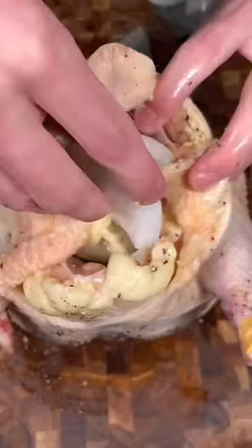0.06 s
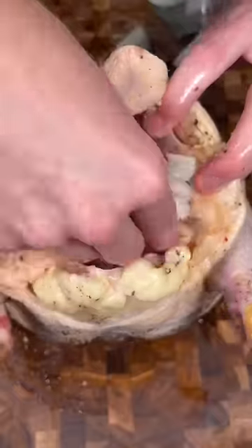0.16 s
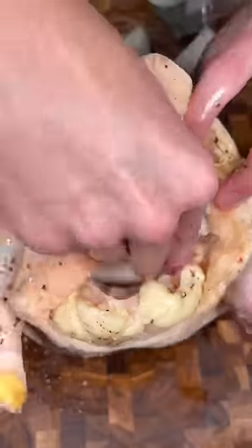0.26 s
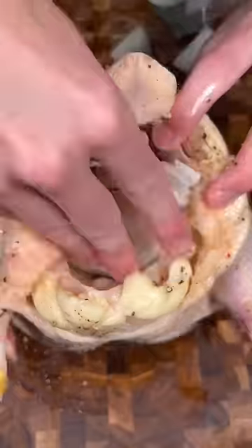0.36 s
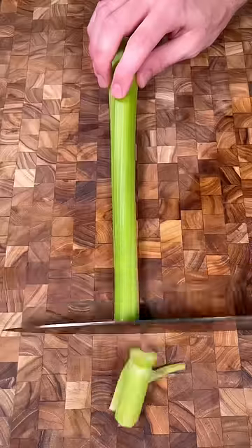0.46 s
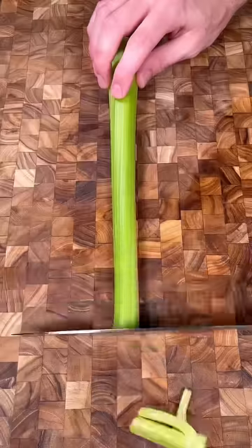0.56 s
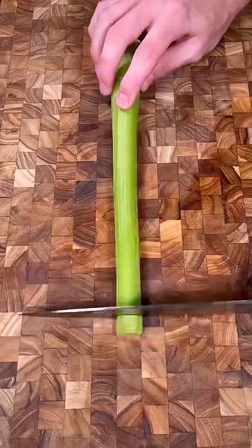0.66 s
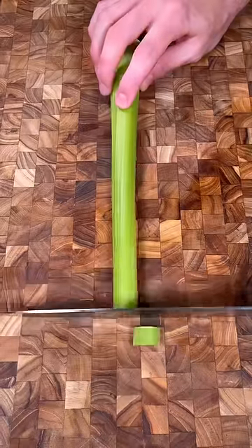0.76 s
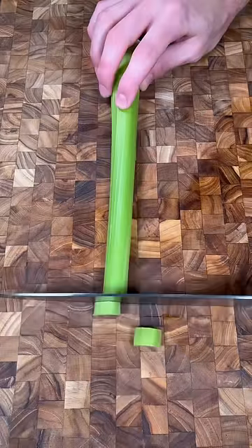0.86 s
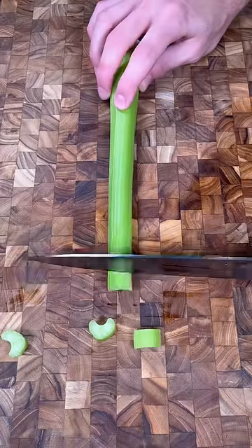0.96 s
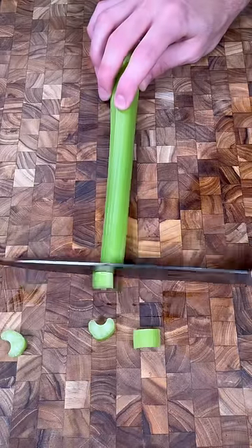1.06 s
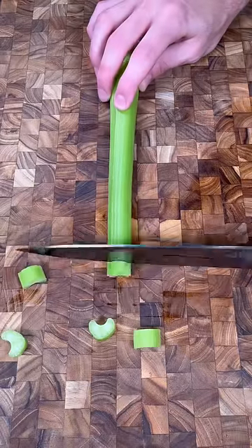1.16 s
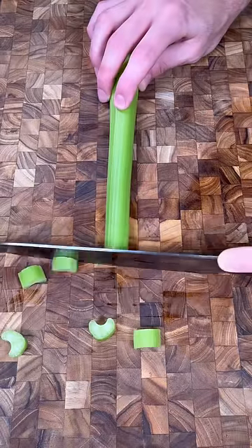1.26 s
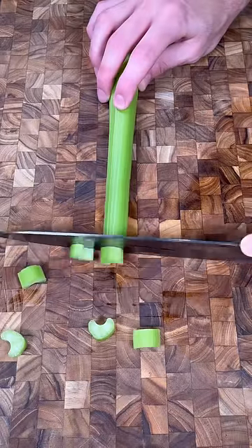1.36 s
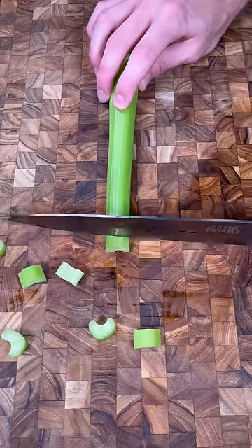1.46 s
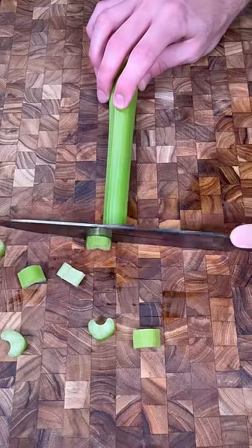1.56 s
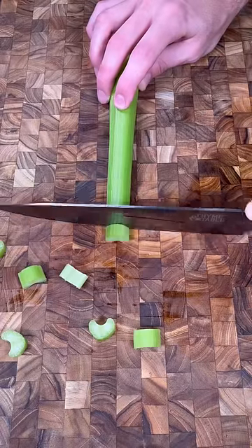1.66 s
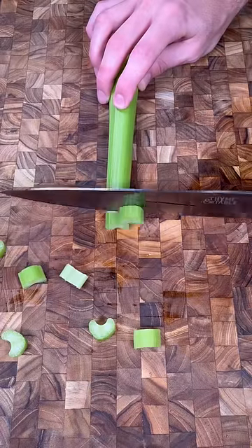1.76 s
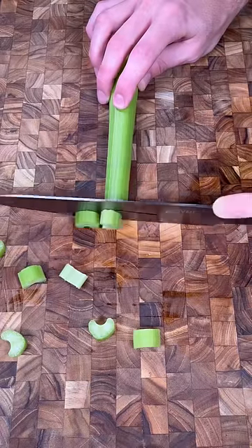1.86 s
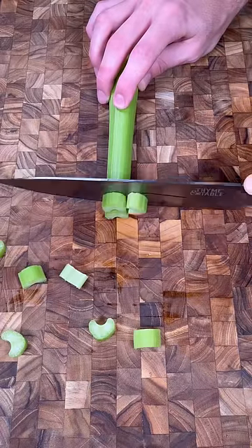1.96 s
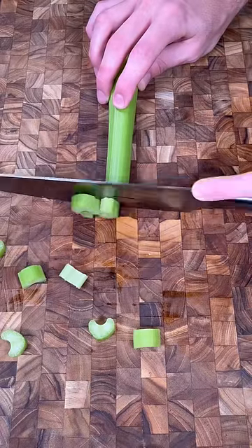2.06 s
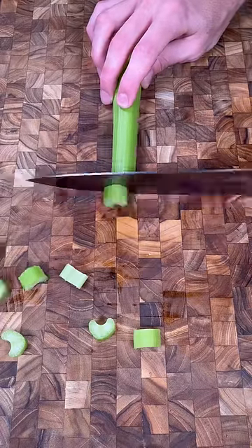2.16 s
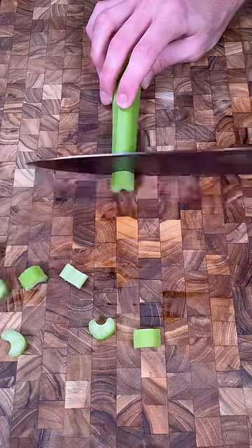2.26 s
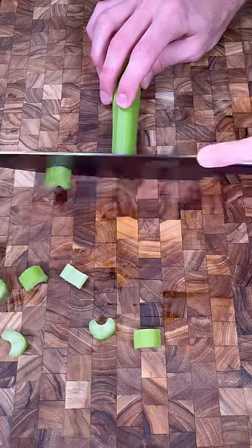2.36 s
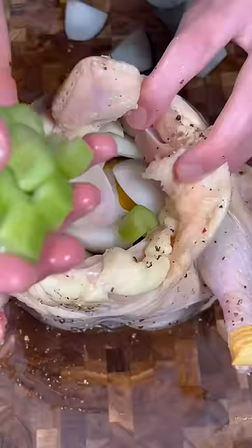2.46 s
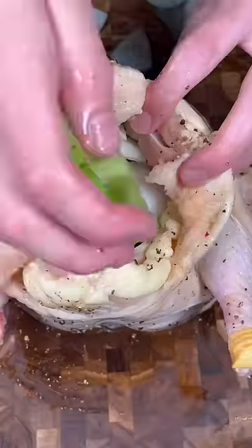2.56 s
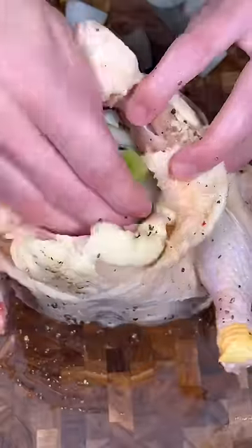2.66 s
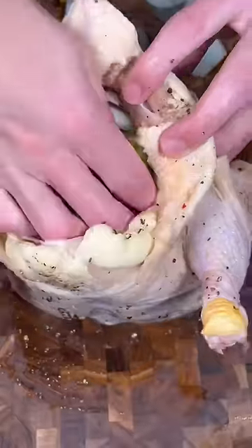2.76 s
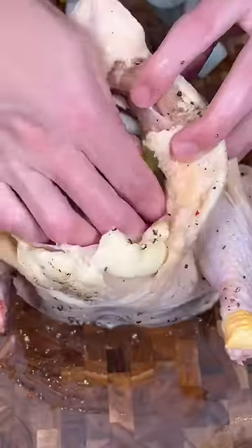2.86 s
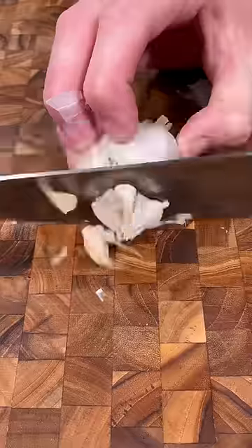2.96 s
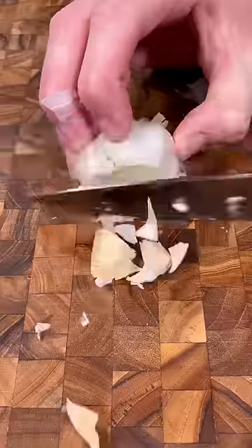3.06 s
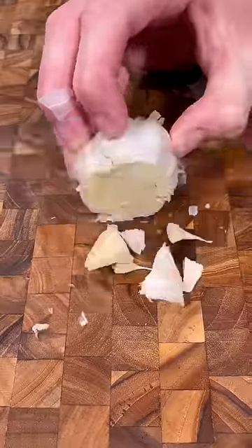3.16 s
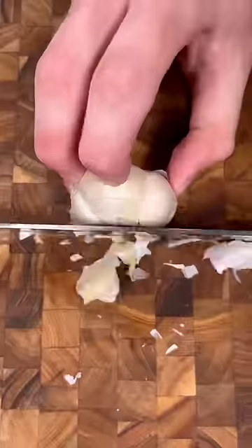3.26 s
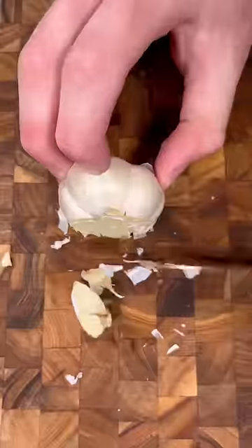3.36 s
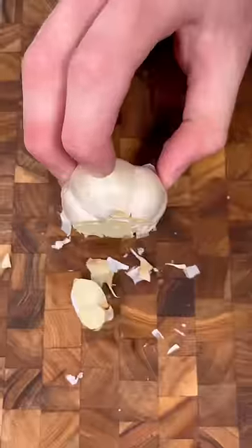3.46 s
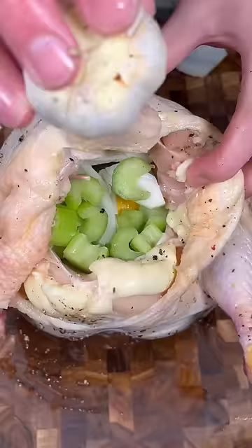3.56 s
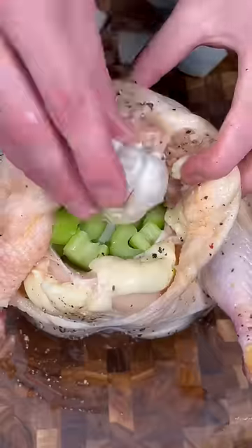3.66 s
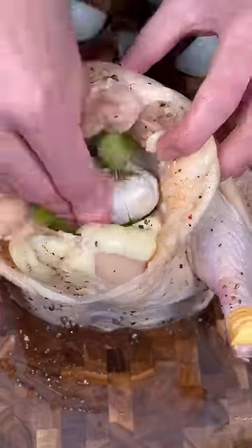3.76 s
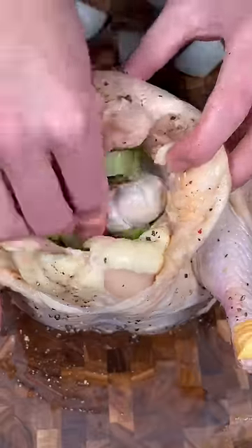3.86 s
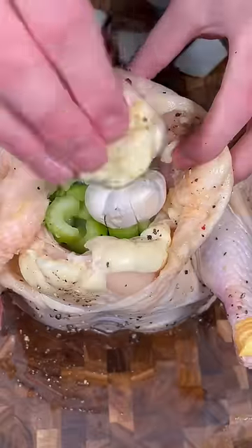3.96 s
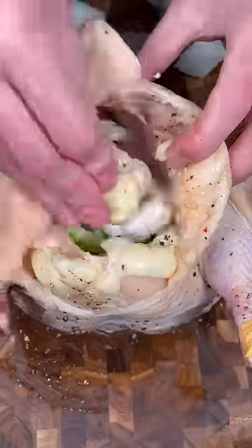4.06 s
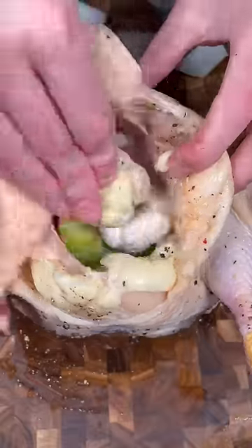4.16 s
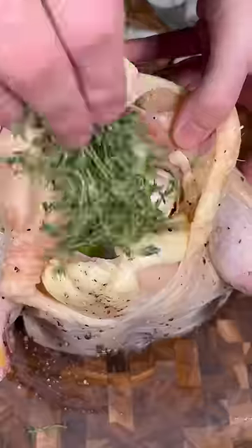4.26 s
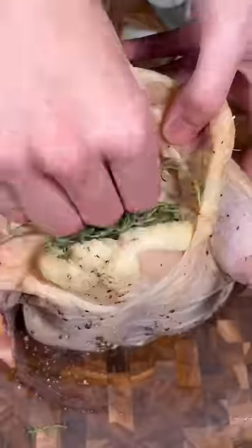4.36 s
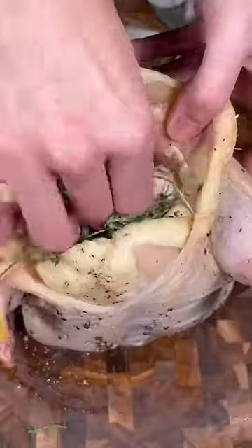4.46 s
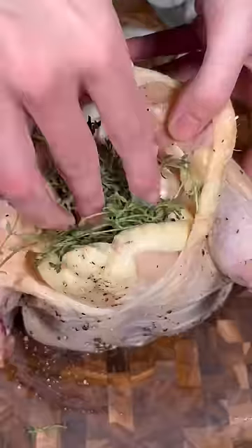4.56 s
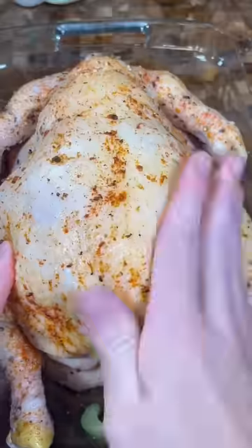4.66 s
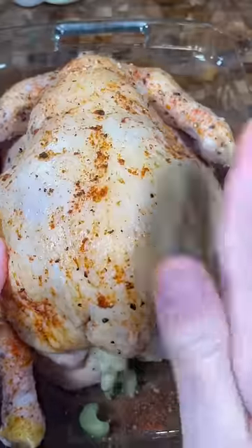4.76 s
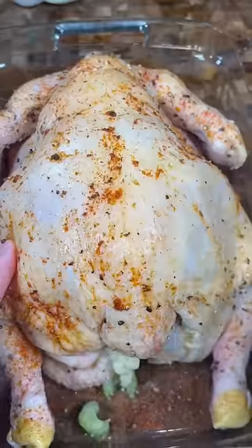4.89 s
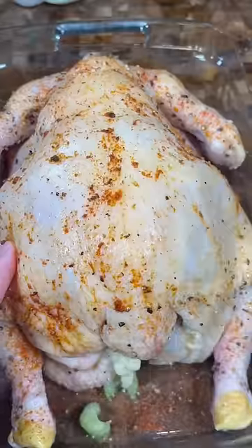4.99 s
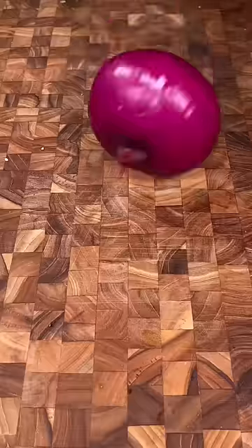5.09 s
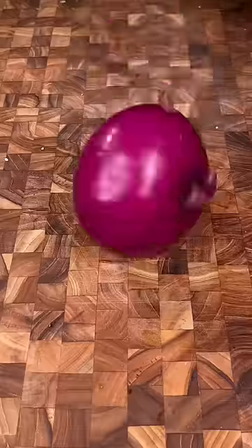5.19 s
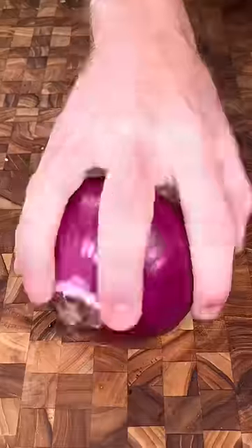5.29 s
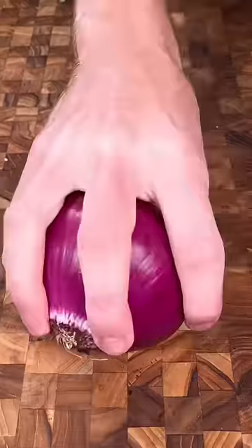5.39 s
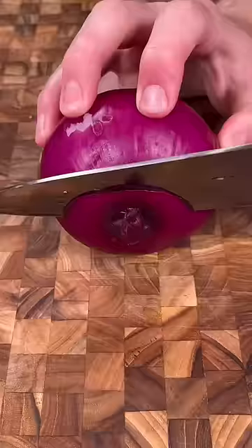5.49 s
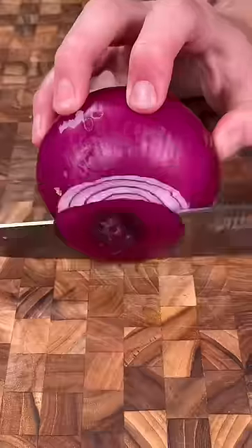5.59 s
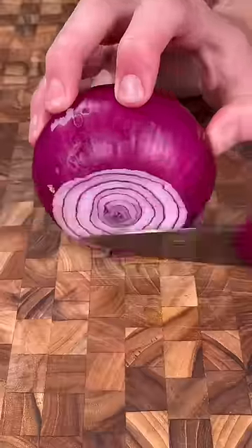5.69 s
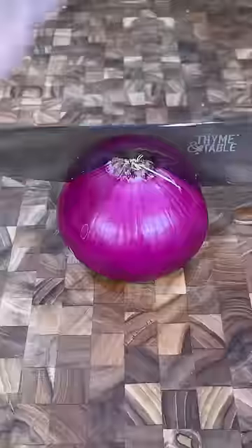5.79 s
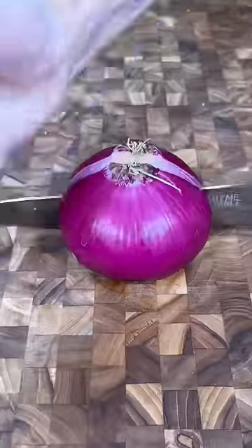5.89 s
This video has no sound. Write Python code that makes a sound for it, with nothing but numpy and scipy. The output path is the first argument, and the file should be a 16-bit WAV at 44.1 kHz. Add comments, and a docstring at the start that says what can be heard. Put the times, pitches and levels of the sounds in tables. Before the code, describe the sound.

Close stereo microphone in a hard-walled kitchen with low steady background rumble. Soft wet rustles first, then twelve crisp celery chops on thick wood, more stuffing sounds, two very crunchy garlic cuts, moist presses and herb rustle, one flat slap, a bumping onion roll, and two heavy onion chops. Echoes stop abruptly at each cut.

```python
"""Chopping and stuffing in a reverberant kitchen

Short kitchen shots joined by hard cuts, close to a two-port microphone: a knife goes through celery, garlic and
onion onto a thick wooden board, hands stuff and slap a chicken, an onion rolls. Blows are sums of decaying modes
plus a noise crack; slicing, rustling and stuffing are trains of random snaps. Sparse reflections make the
hard-walled kitchen ring until the next cut, and the loudest blows overload the input.
"""
import sys
import numpy as np
from scipy import signal
from scipy.fft import rfft, irfft, next_fast_len
from scipy.io import wavfile

SR = 44100
rng = np.random.default_rng(int(sys.argv[2]) if len(sys.argv) > 2 else 0)


def master(y):
    """Save y as 16-bit WAV."""
    cut = np.clip(np.atleast_2d(y).T, -1, 1)
    pcm = np.round(cut * 32767)  # scale
    wavfile.write(sys.argv[1], SR, pcm.astype(np.int16))


def invert_db(level):
    """Linear amplitude ratio for a level in decibels (20 dB per decade), elementwise."""
    return 10 ** (np.asarray(level, dtype=float) / 20)


N = 261513  # length in samples

# Beginnings of the shots. Each entry: time in seconds.
SHOT_STARTS = [0, 0.418, 0.619, .808, .963, 1.157, 1.309, 1.466, 1.644, 1.783, 1.944, 2.107, 2.254, 2.463,
               2.922, 3.219, 3.588, 3.896, 3.934, 4.219, 4.63, 5.059, 5.485, 5.795]

# Kitchen background spectrum. Each row: frequency in Hz, relative density in dB per Hz.
HUM_SPECTRUM = [(24, -37.5), (40, -4), (200, -3), (392, -12.5), (466, -12), (568, -22), (1200, -26.5),
                (1530, -32.5), (2110, -35.5), (5290, -41), (6460, -46), (10900, -48.5), (12900, -49.5),
                (15000, -45)]
HUM_DB = -39  # rms before the slow waver

# Reverberation. Each row: frequency in Hz, t60 in seconds.
KITCHEN_T60 = [(100, 0.87), (260, 0.83), (700, 1), (1840, 0.89), (4850, 0.95), (12800, 0.69)]
# Coherence of the two ports. Each row: frequency in Hz, correlation from 0 to 1.
PORT_LIKENESS = [(60, .93), (250, .8), (600, .3), (1400, .55), (3000, .6), (5500, .85), (8000, .9),
                 (14000, .9)]
# Phase between the ports. Each row: frequency in Hz, lead of the left port in radians.
PORT_LEAD = [(0, 0), (1460, -.5), (2410, 1.9), (3880, 1.2), (5080, 1.6), (5600, 2.9), (6250, 3.3),
             (7580, 6.1), (8870, 6.5), (9650, 9.3), (10900, 9.6), (11800, 12.6), (13400, 12.7),
             (14200, 15.5), (15600, 16.1)]
# Level between the ports. Each row: frequency in Hz, left minus right in dB.
PORT_TILT = [(110, 0), (380, -2), (700, -2.5), (1290, 0), (4400, -.5), (8000, 0)]

# Dull bumps carried through the board. Each row: start in seconds, level in dB, frequency in Hz.
BUMPS = [(2.642, -34, 222), (2.865, -11, 116.4), (3.718, -35, 199), (4.009, -22, 224), (4.297, -17, 83),
         (4.789, -16, 59.6), (5.056, -21, 116), (5.076, -10, 108), (5.11, -17, 128), (5.145, -14, 61.4),
         (5.226, -15, 106), (5.258, -12, 111), (5.284, -16, 56.5), (5.308, -4.5, 111.3), (5.337, -10, 75.6),
         (5.375, -28, 88.8), (5.548, -20, 126)]
BUMP_T60_S = .09
# The dish under the slap. One row: start in seconds, level in dB, frequency in Hz, t60 in seconds.
SLAP_THUD = (4.694, -11, 64.6, .24)

# Taps and wet ticks. Each row: start in seconds, ring level in dB, ring frequency in Hz, ring t60 in seconds,
# crack level in dB.
TAPS = [(0.08, -28.5, 463, 0.052, -22), (0.108, -21, 465, 0.054, -24), (0.266, -29.5, 908, 0.029, -26),
        (0.334, -33.5, 980, 0.042, -32), (1.49, -22, 842, 0.0067, -25), (1.969, -19, 745, 0.0089, -25),
        (2.609, -15, 442, 0.016, -35), (2.647, -9, 464, 0.017, -43.5), (2.677, -27, 470, 0.018, -35),
        (2.756, -24, 470, 0.023, -36.5), (2.891, -27, 490, 0.0067, -39), (3.074, -5.5, 490, 0.01, -22),
        (3.647, -45, 423, 0.012, -36), (3.722, -40, 1790, 0.02, -19), (3.73, -21.5, 434, 0.023, -24),
        (3.769, -31, 432, 0.02, -26), (3.813, -46, 401, 0.016, -33), (3.993, -29.5, 990, 0.0067, -37),
        (4.0085, -8, 1850, 0.015, -27), (4.01, -5.5, 1020, 0.018, -22), (4.029, -20.5, 450, 0.02, -26.5),
        (4.097, -31.5, 1073, 0.023, -36.5), (4.148, -42, 541, 0.018, -33), (4.161, -33, 1720, 0.028, -30),
        (4.296, -17.5, 1870, 0.013, -26.5), (4.312, -18.5, 574, 0.018, -30.5),
        (4.316, -21, 1050, 0.014, -36), (5.071, -27.5, 400, 0.032, -35.5), (5.299, -11, 828, 0.016, -19)]
# Flat hand on the bird. One row with the columns of TAPS.
SLAP = (4.686, -3, 402, 0.013, 4)
TAP_ROOM_DB, SLAP_ROOM_DB = -12, -1.5  # sends to the room
# Flat wet contact spectrum. Each row: frequency in Hz, relative level in dB.
SMACK_SPECTRUM = [(250, -20), (600, -5), (1500, -1), (3000, 0), (5000, 1), (8000, -3), (14000, -12),
                  (17000, -30)]

# Snaps heard in air. Each row: frequency in Hz, relative level in dB.
CRACKLE_SPECTRUM = [(1500, -38), (2600, -3.5), (4000, 1), (6000, 1), (9000, -0.5), (13000, 0),
                    (15900, -6.5), (16800, -19), (20000, -30.5)]
# Snaps heard through the food. Each row: frequency in Hz, relative level in dB.
BODY_SPECTRUM = [(150, -4.5), (400, 17), (1000, 10), (2000, 14), (3200, -35.5)]
LUMP_HZ, LUMP_DB = 70, 2.2  # fibres give way in clumps: fastest fluctuation, rms depth

# The onion's skin rubs along the board. One row: start in seconds, end in seconds.
ROLL_SPAN = (5.062, 5.29)
ROLL_DB, ROLL_BODY_DB = -70, 18  # crackle level; body sound relative to it, which dominates

# Fingers pressing food and herbs into the bird, one curve a reach. Each row: time in seconds, crackle level in dB.
STUFFING = [
    [(.048, -70), (.06, -39), (.108, -31.5), (.135, -36), (.16, -46)],
    [(.26, -52), (.298, -35), (.325, -36), (.338, -28), (.352, -40), (.41, -55)],
    [(2.465, -52), (2.59, -58), (2.66, -47), (2.73, -50), (2.765, -41), (2.79, -52), (2.915, -54)],
    [(3.645, -31), (3.711, -33), (3.725, -22), (3.787, -43), (3.885, -36), (3.897, -50), (3.934, -52)],
    [(3.995, -50), (4.005, -25), (4.079, -47), (4.169, -33), (4.18, -42), (4.201, -26), (4.21, -39.5)],
    [(4.262, -42), (4.29, -28.5), (4.314, -29), (4.346, -50), (4.448, -46), (4.504, -56), (4.574, -42.5),
     (4.62, -70)],
]
# Body sound of each reach. Each entry: level relative to the crackle in dB.
STUFFING_BODY_DB = [-2, -5, 0, -8, -8, -4]

# Skin, peel or cut pieces rustle once. Each row: peak time in seconds, crackle level in dB,
# fading time in seconds, body sound relative to the crackle in dB.
RUSTLES = [(2.345, -21, .022, -6), (2.617, -25, .01, 0), (2.924, -28, .004, -10), (3.075, -13, .012, -8),
           (3.308, -16, .03, -8), (4.682, -32.5, .008, -5), (5.299, -23, .012, 2), (5.65, -23.5, .135, -2),
           (5.8, -41, .03, -3)]
RUSTLE_RISE_S, RUSTLE_FADE_DB = .012, -12  # rise before the peak; level of both ends relative to it

# The blade's way down to each blow, in the order of CHOPS. Each row: entry time in seconds, crackle at entry in dB,
# crackle before breaking through in dB, time from breakthrough to blow in seconds,
# body sound relative to the crackle in dB.
SLICES = [(.448, -47, -30, .008, -1), (.632, -42, -27, .01, -4), (.809, -33, -31, .009, -2),
          (.966, -43, -34, .009, -1), (1.165, -35, -33, .009, 0), (1.315, -30, -28, .01, -2),
          (1.487, -32.5, -29, .01, -5), (1.647, -40, -24, .009, -2), (1.792, -30, -29, .008, -4),
          (1.958, -42, -23, .009, -4), (2.115, -32, -25, .011, -4), (2.256, -31, -22, .01, -8),
          (2.927, -3.5, -7, .008, -14), (3.221, -7, -5.5, .004, -10), (5.525, -35, -12, .005, -5),
          (5.826, -32, -10, .009, -9)]
BREAK_S, BREAK_DB = .006, 5  # the last skin gives way in a short louder burst
ENTER_S, FREE_DB = .004, -6  # onset of every stroke; sag of the crackle once the blade runs free

# Blade meets board. Each row: time in seconds, blow peak in dB, edge crack in dB, counter thud peak in dB,
# hardness in dB per octave.
CHOPS = [(0.4667, 11, -13.5, -12.5, 3), (0.6758, 8.5, -22, -14, 0.5), (0.8321, 8, -16.5, -38.5, 0.5),
         (1.0068, 7.5, -13, -15.5, 0), (1.2019, 6, -13.5, -14, -1), (1.3483, 10.5, -14, -14, 1),
         (1.5259, 10, -13.5, -14.5, 0.5), (1.686, 9, -12, -13.5, 1), (1.8349, 9, -12.5, -13.5, 1),
         (2.0103, 7.5, -18.5, -13.5, -0.5), (2.1619, 4, -11, -14, -3), (2.2872, 7.5, -17, -13.5, 0),
         (2.967, 6.5, -19, -9.5, -2), (3.245, 7, -20.5, -7.5, -3), (5.5976, 11, -12, -9.5, -.5),
         (5.853, 12.5, -20, 0, 0)]
# Modes of the board. Each row: mean frequency in Hz, mean relative level in dB, t60 in seconds (at most 0.055 sounds).
BOARD_MODES = [(222, -4.5, 0.18), (300.8, 0.5, 0.12), (373.4, 2, 0.13), (495.3, 0.5, 0.047),
               (648, 9, 0.023), (745, 1, 0.033), (896.3, 0.5, 0.028), (973.4, 6.5, 0.029),
               (1063, -0.5, 0.038), (1256, 9.5, 0.017), (1403, -1, 0.03), (1567, 8.5, 0.015),
               (1790, -4.5, 0.03), (1921.5, 3, 0.016), (2124, 2.5, 0.012), (2656, -13, .02),
               (3280, -17.5, 0.018), (3995, -9, 0.008), (4900, -10, 0.007)]
# Modes of the counter. Each row: frequency in Hz, relative level in dB, t60 in seconds.
COUNTER_MODES = [(58, -1, 0.18), (85.9, 5.5, 0.14), (131.8, 9, 0.11), (155.3, -3.5, .1)]
# Steel on wood. Each row: frequency in Hz, relative level in dB.
EDGE_SPECTRUM = [(1500, -22), (2600, -6), (4000, 0), (5500, 1), (9000, -8), (14000, -6), (17000, -18.5)]


def evened(x):
    """Normalization: scales to rms 1."""
    return x / np.sqrt(np.mean(x ** 2) + 1e-20)


def read(points, hz):
    """Interpolation of a spectrum on a logarithmic frequency axis."""
    f, value = np.transpose(points)
    return np.interp(np.log(hz + 1), np.log(f + 1), value)


def shape(x, gain):
    """Linear filtering: multiplies the Fourier spectrum by a function of frequency."""
    size = next_fast_len(x.shape[-1])
    return irfft(rfft(x, size) * gain(np.fft.rfftfreq(size, 1 / SR)), size)[..., :x.shape[-1]]


def add(mix, start_s, sound):
    """Superposition: adds a sound to the mix at its start time."""
    part = mix[round(start_s * SR):][:len(sound)]
    part += sound[:len(part)]


def ring(hz, t60, t):
    """Damped free vibration: one mode, started from rest, decays exponentially."""
    return invert_db(-60 * t / np.maximum(t60, .002)) * np.sin(2 * np.pi * hz * t)


def crack(noise, t, t60, spectrum, snap=10.):
    """Impulsive contact: one sharp snap in a decaying burst of coloured noise that starts at rms 1."""
    burst = noise * invert_db(-60 * t / np.maximum(t60, .004))
    burst = burst + snap * (t == t[24])
    even_hz = np.linspace(0, SR / 2, 200)
    flat = np.sqrt(np.mean(invert_db(2 * read(spectrum, even_hz))))
    return shape(burst, lambda hz: invert_db(read(spectrum, hz)) / flat)


def pair(a, b):
    """Partial coherence: two ports share a and carry b in opposite sign."""
    alike = lambda hz: np.clip(read(PORT_LIKENESS, hz), 0, 1)
    shared = shape(a, lambda hz: np.sqrt((1 + alike(hz)) / 2))
    apart = shape(b, lambda hz: np.sqrt((1 - alike(hz)) / 2))
    return np.array([shared + apart, shared - apart])


def hum():
    """Stationary coloured noise whose level wavers a little: the steady low background."""
    a, b, slow = rng.standard_normal((3, N))
    waver = invert_db(2.2 * evened(shape(slow, lambda hz: hz < 8)))
    steady = evened(shape(pair(a, b), lambda hz: invert_db(read(HUM_SPECTRUM, hz))))
    return invert_db(HUM_DB) * waver * steady


def kitchen():
    """Reverberation: sparse reflections of random sign, each band decaying at its own rate."""
    hits = np.zeros((2, SR // 2))
    slots = np.arange(140, SR // 2 - 12, 12)
    at = slots + rng.integers(0, 12, (2, len(slots)))
    signs = rng.choice([-1., 1.], (2, len(slots)))
    np.put_along_axis(hits, at, signs, 1)
    hz, t, z = signal.stft(hits, SR, nperseg=256)
    near_walls = 1 + 1.38 * np.exp(-t / 0.017)  # counter and tiles answer first and loudest
    decay = invert_db(-60 * t / read(KITCHEN_T60, hz)[:, None])
    tail = signal.istft(z * decay * near_walls, SR, nperseg=256)[1]
    tail = pair(*tail) * (np.arange(tail.shape[1]) > 130)
    return tail / np.linalg.norm(tail[0])


def bumps():
    """Low-frequency excitation: a push with a soft start sets one low mode ringing."""
    out, t = np.zeros(N), np.arange(SR // 4) / SR
    soft_start = 1 - np.exp(-(t / 0.0049) ** 2)
    for s, db, hz, t60 in [(*row, BUMP_T60_S) for row in BUMPS] + [SLAP_THUD]:
        add(out, s, invert_db(db) * ring(hz, t60, t) * soft_start)
    return out


def taps():
    """Impact: each small contact and the slap make a short ring and a crack; also gives their room send."""
    out, sent, t = np.zeros(N), np.zeros(N), np.arange(4096) / SR
    rows = [(*row, TAP_ROOM_DB) for row in TAPS] + [(*SLAP, SLAP_ROOM_DB)]
    noises = rng.standard_normal((len(rows), len(t)))
    for (s, db, hz, t60, crack_db, room_db), noise in zip(rows, noises):
        tap = invert_db(db) * ring(hz, t60, t)
        tap += invert_db(crack_db) * crack(noise, t, 0.9 * t60, SMACK_SPECTRUM, 6.)
        add(out, s, tap)
        add(sent, s, tap * invert_db(room_db))
    return out, sent


def snaps(per_s, spread_db):
    """Random fracture: cells and fibres snap, bright in air and dull through the food."""
    happens = rng.random(N) < per_s / SR
    size = invert_db(spread_db * np.minimum(rng.exponential(1, N), 4))
    x = happens * size * rng.standard_normal(N)
    x *= invert_db(LUMP_DB * evened(shape(rng.standard_normal(N), lambda hz: hz < LUMP_HZ)))
    bright = evened(shape(x, lambda hz: invert_db(read(CRACKLE_SPECTRUM, hz))))
    dull = evened(shape(x, lambda hz: invert_db(read(BODY_SPECTRUM, hz))))
    return bright, dull


def stroke(out, source, times, crackle_db, body_db):
    """Amplitude modulation: a level curve in dB opens a stretch of snaps, bright and dull together."""
    bright, dull = source
    span = slice(round(times[0] * SR), round(times[-1] * SR))
    t = np.arange(N)[span] / SR
    edges = np.clip(np.minimum((t - times[0]) / ENTER_S, (times[-1] - t) / .0015), 0, 1)
    level = invert_db(np.interp(t, times, crackle_db))
    out[span] += edges * level * (bright[span] + invert_db(body_db) * dull[span])


def onion_roll(source):
    """Rolling friction: a steady rub of the skin, heard mostly through the onion's body."""
    out = np.zeros(N)
    stroke(out, source, ROLL_SPAN, [ROLL_DB, ROLL_DB], ROLL_BODY_DB)
    return out


def stuffing(source):
    """Crackle under pressure: its level follows the fingers through each reach."""
    out = np.zeros(N)
    for rows, body_db in zip(STUFFING, STUFFING_BODY_DB):
        times, crackle_db = np.transpose(rows)
        stroke(out, source, times, crackle_db, body_db)
    return out


def rustles(source):
    """Transient friction: the crackle rises to one peak and fades."""
    out = np.zeros(N)
    for s, db, lasts, body_db in RUSTLES:
        end_db = db + RUSTLE_FADE_DB
        stroke(out, source, [s - RUSTLE_RISE_S, s, s + lasts], [end_db, db, end_db], body_db)
    return out


def slices(source):
    """Progressive fracture: crackle moves in a straight dB line, bursts at breakthrough, then sags."""
    out = np.zeros(N)
    for (enters, entry_db, through_db, early, body_db), (blow, *_) in zip(SLICES, CHOPS):
        times = [enters, blow - early - BREAK_S, blow - early, blow]
        burst_db = through_db + BREAK_DB
        stroke(out, source, times, [entry_db, through_db, burst_db, burst_db + FREE_DB], body_db)
    return out


def chops():
    """Modal excitation: each blow rings the board from a slightly different spot, cracks, and thumps the counter."""
    knock, thump, t = np.zeros(N), np.zeros(N), np.arange(SR // 4) / SR
    hz, mode_db, t60 = np.transpose(BOARD_MODES)[..., None]
    modes = len(BOARD_MODES)
    build = 1 - np.exp(-t * hz / 2.34)  # low modes take longer to speak
    thud = sum(invert_db(db) * ring(f, d, t) for f, db, d in COUNTER_MODES)
    thud = thud * (1 - np.exp(-(t / 0.01) ** 2))  # the heavy top starts slowly
    for s, blow_db, crack_db, thud_db, hardness in CHOPS:
        spot_db = 1.2 * rng.standard_normal((modes, 1))
        spot_db = spot_db + np.clip(hardness, -3, 3) * np.log2(hz / 1000)
        spot_hz = hz * (1 + .015 * rng.standard_normal((modes, 1)))
        board = invert_db(mode_db + spot_db) * ring(spot_hz, np.minimum(t60, .055), t) * build
        board = board.sum(0)
        edge = crack(rng.standard_normal(len(t)), t, 0.02, EDGE_SPECTRUM)
        add(knock, s, invert_db(blow_db) * board / abs(board).max() + invert_db(crack_db) * edge)
        add(thump, s, invert_db(thud_db) * thud / abs(thud).max())
    return knock, thump


def scene():
    """Direct sound plus reverberation: every shot rings from one of five spots, only until the next cut."""
    out = hum()
    spots = [kitchen() for _ in range(5)]
    tap, tap_sent = taps()
    fine, coarse = snaps(9000, 3), snaps(6000, 3.4)
    strokes = onion_roll(coarse) + stuffing(coarse) + rustles(fine) + slices(fine)
    knock, thump = chops()
    low = thump + bumps()
    direct = tap + strokes + knock + low
    sent = tap_sent + invert_db(-8.) * strokes + invert_db(-1.5) * knock + invert_db(-12.) * low
    marks = [round(s * SR) for s in SHOT_STARTS] + [N]
    for shot, (a, b) in enumerate(zip(marks, marks[1:])):
        room = signal.fftconvolve(sent[None, a:b], spots[shot % len(spots)], axes=1)
        out[:, a:b] += direct[a:b] + room[:, :b - a]
    return out


def top_cut(x):
    """Nothing passes above the cut-off."""
    return signal.sosfilt(signal.butter(12, 16000, fs=SR, output="sos"), x)


def record(dry):
    """Two-port reception: level and phase differ between the ports by frequency; the input overloads."""
    side = np.array([[.5], [-.5]])  # left and right take half of each difference
    level = lambda hz: invert_db(side * read(PORT_TILT, hz))
    lead = lambda hz: np.exp(1j * side * np.interp(hz, *np.transpose(PORT_LEAD)))
    ports = shape(dry, lambda hz: level(hz) * lead(hz))
    overloaded = np.clip(ports, -1, 1)
    return top_cut(overloaded)


dry = scene()
out = record(dry)
master(out)
```